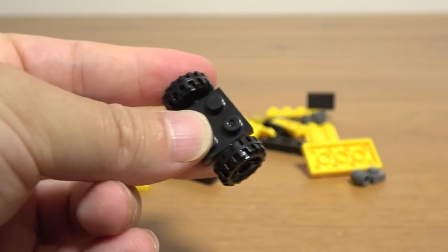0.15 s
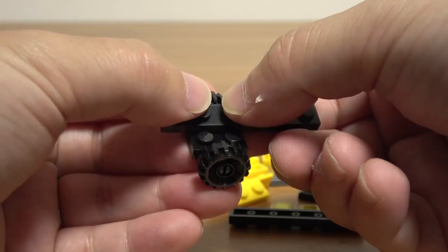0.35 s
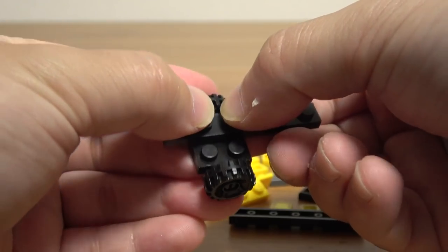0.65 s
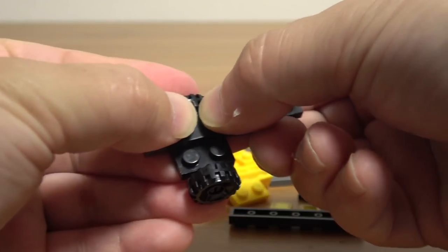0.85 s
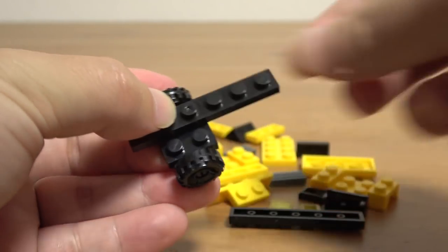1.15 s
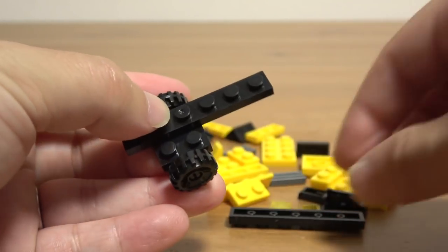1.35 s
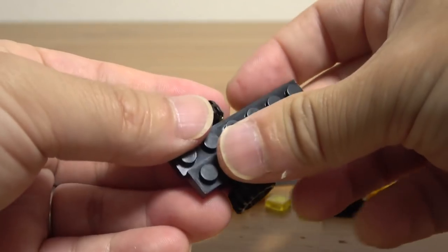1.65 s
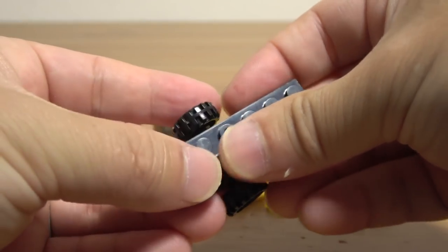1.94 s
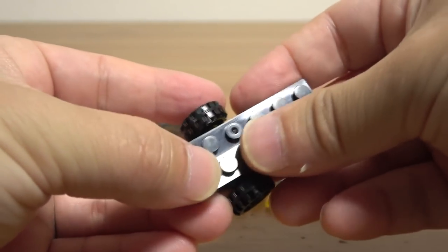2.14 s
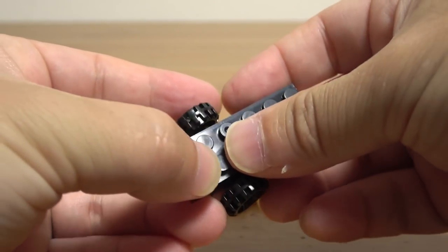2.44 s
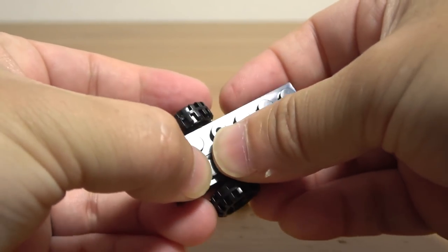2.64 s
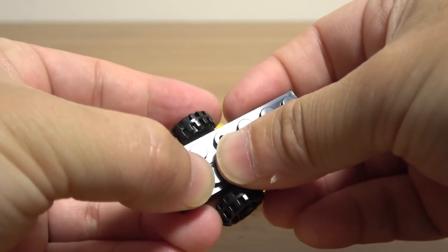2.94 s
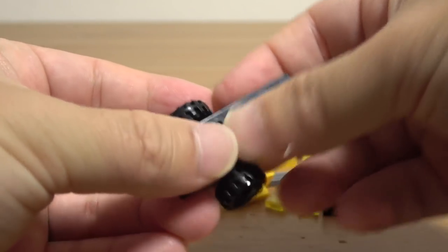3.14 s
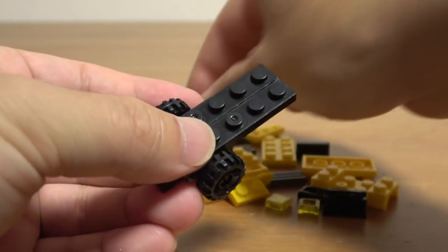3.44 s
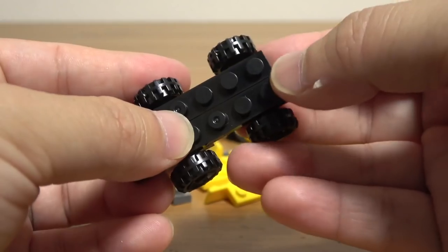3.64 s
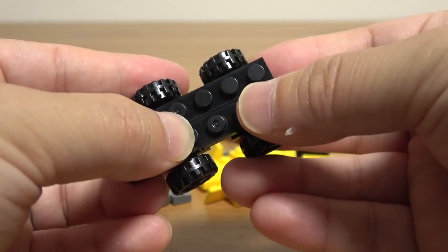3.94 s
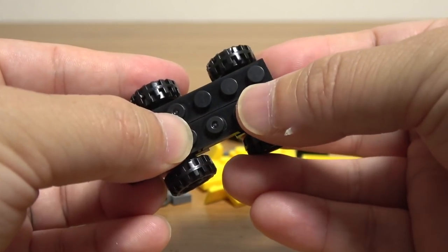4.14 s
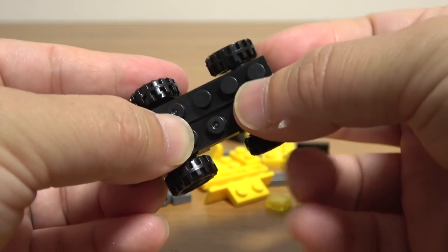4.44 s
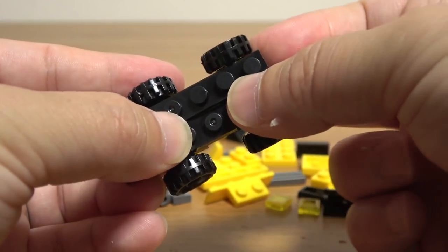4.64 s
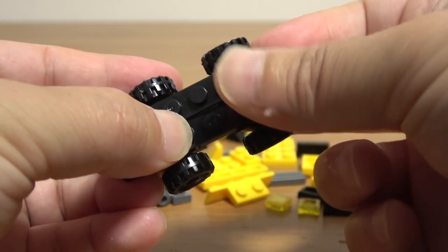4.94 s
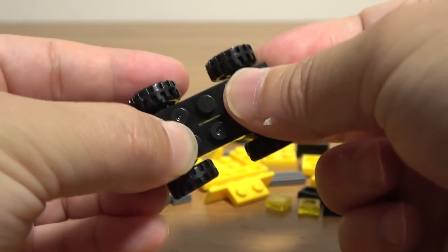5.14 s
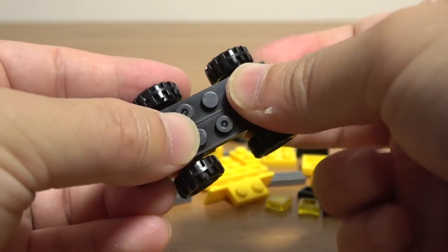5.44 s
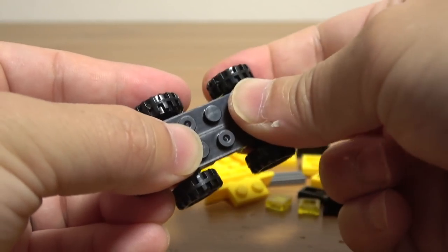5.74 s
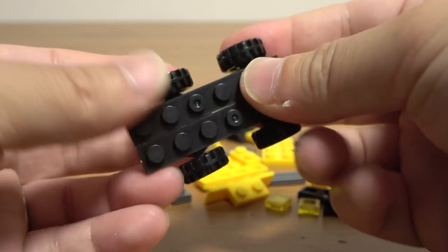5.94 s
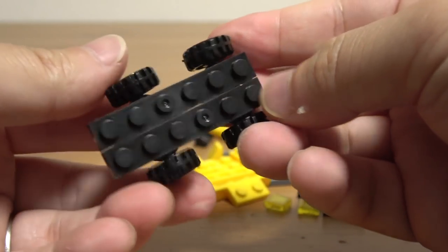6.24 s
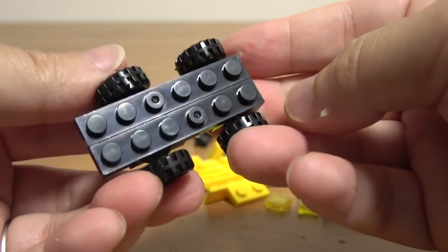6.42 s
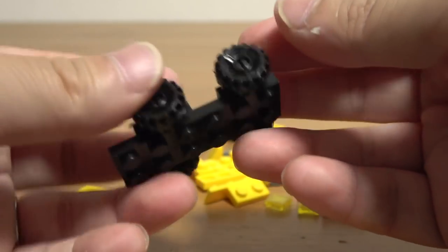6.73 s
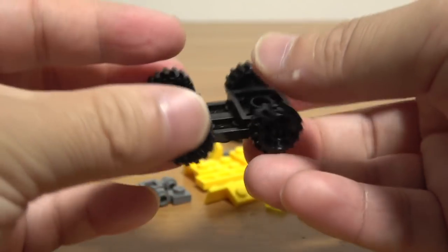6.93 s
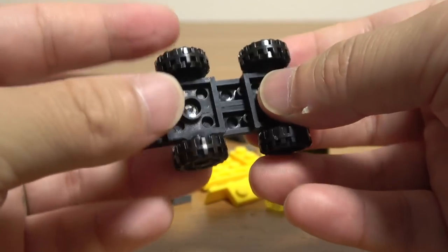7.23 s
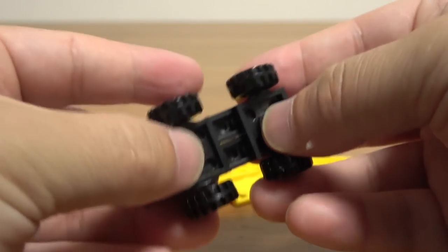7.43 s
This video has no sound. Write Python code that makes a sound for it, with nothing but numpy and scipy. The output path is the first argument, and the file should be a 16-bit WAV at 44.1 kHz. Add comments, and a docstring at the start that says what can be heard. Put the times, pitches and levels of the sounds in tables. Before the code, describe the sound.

Close up, plastic building bricks snap together one at a time, with short pauses and tiny ticks between the crisp clicks. After one especially sharp snap midway and a couple more, the handling turns into a busier patter of small clicks and soft finger rubbing. The small room is quiet, with only faint ventilation hum and hiss.

```python
"""Small plastic bricks are pressed and snapped together by hand, close by, on a wooden table.
Each contact is a brief impact that excites the damped modes of a brick; pushes pass through the hands
into the table, and sliding bricks and fingers make friction noise. A small room reflects the bricks.
Behind them are ventilation rumble, hiss, mains hum, a faint triple chirp like a far cricket,
and a small motor that buzzes on and off as its steps drive the resonances of its housing."""
import sys
import numpy as np
from scipy import signal
from scipy.fft import rfft, irfft
from scipy.io import wavfile
from scipy.ndimage import uniform_filter1d

SR = 44100
rng = np.random.default_rng(int(sys.argv[2]) if len(sys.argv) > 2 else 0)


def output_pcm(signal):
    """Save a mono or channel-first signal as 16-bit PCM at the path in sys.argv[1].

    Samples are clipped to [-1, 1] before scaling.
    """
    pcm = np.clip(np.atleast_2d(signal).T, -1, 1) * 32767
    wavfile.write(sys.argv[1], SR, np.round(pcm).astype(np.int16))


N = 334278


def gain_of(db):
    """Amplitude ratio of a level in decibels."""
    return 10 ** (np.asarray(db) / 20)


def unit(x):
    """Normalisation to unit energy."""
    return x / np.sqrt(np.sum(x ** 2) + 1e-30)


def read(points, hz):
    """Interpolation on a logarithmic frequency axis."""
    f, value = np.transpose(points)
    return np.interp(np.log(hz + 1), np.log(f + 1), value)


def add(mix, s, sound):
    """Superposition: a sound joins the mix at time s."""
    part = mix[..., round(s * SR):][..., :sound.shape[-1]]
    part += sound[..., :part.shape[-1]]


def resonate(x, hz, width):
    """Forced response of a two-pole resonator of peak gain 1."""
    return signal.lfilter(*signal.iirpeak(min(hz, .49 * SR), hz / width, SR), x)


def modes(table, t, rise_ms=0.11):
    """Free vibration: a sum of damped sines with a quick onset, of unit energy."""
    # neighbouring modes swing in opposite directions, so no holes open between them
    ring = sum((-1) ** k * gain_of(db - 60 * 1000 * t / t60) * np.sin(2 * np.pi * hz * t)
               for k, (hz, t60, db) in enumerate(table))
    return unit(ring * (1 - np.exp(-t * 1000 / rise_ms)))


def noise(density, correlation):
    """Partly coherent stereo noise of spectral density(hz, t), in dB per Hz."""
    hz, t = np.fft.rfftfreq(1024, 1 / SR), np.arange(N // 256 + 5) * 256 / SR
    a, b, c, d = rng.standard_normal((len(t), 513, 4)).T
    shared = np.clip(correlation * np.ones(513), -1, 1)[:, None]
    left = a + 1j * b
    right = shared * left + np.sqrt(1 - shared ** 2) * (c + 1j * d)
    spectra = np.array([left, right]) * gain_of(density(hz[:, None], t) + 17)
    return signal.istft(spectra, nperseg=1024, noverlap=768)[1][:, :N]


def ventilation():
    """Broadband rumble, coloured differently on each side and partly coherent between them."""
    # spectrum on each side: (frequency [Hz], density [dB per Hz])
    left = [(20, -88), (40, -81.5), (80, -99.5), (125, -81), (220, -86), (480, -89), (570, -94.5),
            (790, -79), (900, -87), (1120, -99), (1250, -97), (1550, -107), (2500, -106), (4000, -110),
            (16000, -130)]
    right = [(20, -95.5), (40, -83), (80, -91.5), (125, -83.5), (220, -88.5), (300, -87), (400, -93.5),
             (500, -92.5), (650, -99), (850, -88.5), (960, -95.5), (1130, -81.5), (1400, -103),
             (2500, -106), (16000, -130)]
    # likeness of the sides: (frequency [Hz], correlation [0-1])
    likeness = [(25, 1), (60, 1), (300, 0.76), (650, 0.58), (1000, 1), (1500, 0.69), (3000, 1)]
    return noise(lambda hz, t: np.array([read(left, hz), read(right, hz)]),
                 read(likeness, np.fft.rfftfreq(1024, 1 / SR)))


def mains_hum():
    """Narrow bands of noise are heard as wavering tones, here a little to the left."""
    # hum lines: (frequency [Hz], level [dB], bandwidth [Hz])
    lines = [(118.3, -68, 10), (239.5, -71.5, 2.8), (497.7, -74, 7.3)]
    hum = np.zeros(N)
    for hz, db, width in lines:
        tone = resonate(rng.standard_normal(N), hz, width)
        hum += gain_of(db) * tone / tone.std()
    return hum * gain_of([[1], [-1]])


def cricket(db=-71, chirps_per_s=12.9, stroke_beats=0.063, waver_rad=1.2):
    """Stridulation: three wing strokes a chirp modulate two slightly unsteady tones."""
    # delay of the chirps behind a steady beat: (time [s], lag [beats])
    lag = [(.4, -0.15), (.41, 0.33), (1.3, 0.27), (1.8, 0.52), (3.5, 0.59), (3.7, 0.43), (5, 0.49),
           (7, 0.67)]
    # strokes of one chirp: (offset [beats], level [dB])
    strokes = [(-.17, -4.5), (0, 4.5), (.16, -4.5)]
    # wing tones: (frequency [Hz], level [dB])
    wing = [(3090, -1), (3330, -5.5)]
    t = np.arange(N) / SR
    beat = chirps_per_s * t - np.interp(t, *np.transpose(lag))
    pulses = sum(gain_of(g) * np.exp(-(((beat - at + .5) % 1 - .5) / stroke_beats) ** 2)
                 for at, g in strokes)
    wander = uniform_filter1d(rng.standard_normal((len(wing), N)), 400, 1)
    tone = sum(gain_of(g) * np.sin(2 * np.pi * hz * t + waver_rad * drift / drift.std())
               for (hz, g), drift in zip(wing, wander))
    return gain_of(db) * pulses * tone / tone.std()


def background():
    """Noise floor: rumble, hum, chirps and hiss add under one level curve."""
    # microphone hiss: (frequency [Hz], density [dB per Hz])
    hiss_spectrum = [(1000, -116), (4000, -110), (6000, -108), (10000, -111), (14000, -115), (15000, -119),
                     (16000, -124)]
    # lower at first and briefly after the loudest snap: (time [s], level [dB])
    level = [(.41, -5), (.43, 1.6), (1.3, 1.5), (3.83, 0.3), (3.87, -1.5), (5.1, 0.8), (7.58, 3)]
    air, hum = ventilation(), mains_hum()
    hiss = noise(lambda hz, t: read(hiss_spectrum, hz), correlation=0.1)
    level_db = np.interp(np.arange(N) / SR, *np.transpose(level))
    return gain_of(level_db) * (air + hum + cricket() + hiss)


def motor():
    """Forced vibration: periodic steps, each with a scratch, drive the housing's resonances."""
    # motor runs: (start [s], end [s], step rate [Hz], level [dB])
    runs = [(0.276, 0.423, 260, -76), (0.755, 1.587, 250, -69.5), (2.387, 3.43, 215, -69.5),
            (3.59, 4.06, 234.2, -70), (5.103, 5.695, 180, -71), (5.717, 6.063, 260, -67.5),
            (7.048, 7.507, 260, -70.5)]
    # housing resonances: (frequency [Hz], bandwidth [Hz], level [dB])
    housing = [(3880, 140, -9), (5400, 50, 0.5), (6006, 300, -6.5), (6950, 780, -2), (7700, 200, 0.5),
               (9900, 890, -6.5), (11600, 500, -20), (12100, 400, -2.5)]
    out = np.zeros(N)
    for start, end, rate_hz, db in runs:
        t = np.arange(round((end - start) * SR)) / SR
        steps = sum(np.cos(2 * np.pi * k * rate_hz * t + 0.96 * rng.standard_normal())
                    for k in range(12, 66))
        scratch = rng.standard_normal(len(t)) * (0.25 + np.exp(-(rate_hz * t % 1) / .3))
        drive = unit(steps) + gain_of(-6) * unit(scratch)
        buzz = sum((-1) ** k * gain_of(g) * resonate(drive, hz, width)
                   for k, (hz, width, g) in enumerate(housing))
        add(out, start, gain_of(db) * unit(buzz) * np.sqrt(len(t)) * signal.windows.tukey(len(t), .3))
    return out


def room(x):
    """Reverberation: early echoes and sparse reflections that decay band by band."""
    # reverberation time: (frequency [Hz], t60 [s])
    decay = [(1000, 0.091), (2600, 0.22), (7000, 0.19), (15000, 0.13)]
    # echoes from nearby surfaces: (delay [ms], level [dB])
    echoes = [(3.9, -6), (5.8, -14.5), (9.8, -11.5)]
    # colour of the reflected sound: (frequency [Hz], gain [dB])
    walls = [(1000, 1.5), (3000, -8.5), (5500, -11), (9000, -11.5), (15000, -3)]
    taps = np.zeros((2, 16000))
    slots = np.arange(60, 15900, 12)
    arrivals = slots + rng.integers(0, 12, (2, len(slots)))
    np.put_along_axis(taps, arrivals, rng.choice([-1., 1.], arrivals.shape), 1)
    taps[1] = taps[0] + 1.1 * taps[1]  # the sides are partly coherent
    hz, t, spectra = signal.stft(taps, SR, nperseg=256)
    absorption = gain_of(-60 * t / read(decay, hz)[:, None])
    tail = unit(signal.istft(spectra * absorption, SR, nperseg=256)[1])
    for ms, db in echoes:
        tail[:, round(ms * SR / 1000)] += gain_of(db)
    grid = np.linspace(0, SR / 2, 65)
    colour = signal.minimum_phase(signal.firwin2(127, grid, gain_of(2 * read(walls, grid)), fs=SR))
    return signal.fftconvolve(x, signal.lfilter(colour, 1, tail), axes=1)[:, :N]


def finger_rub(light_db=-73.5, dulling=.3):
    """Sliding friction makes patchy noise; a firmer touch is louder and duller."""
    # fingers on plastic and skin: (time [s], level [dB])
    touch = [(0.0, -72.5), (0.42, -83), (0.8, -65), (1.41, -63), (1.71, -74.5), (2.15, -70), (3.46, -69),
             (4.16, -77.5), (4.73, -78), (5.38, -69), (5.95, -68), (6.21, -64), (6.33, -69), (6.86, -60.5),
             (7.18, -67), (7.58, -61)]

    def density(hz, t):
        patches = rng.standard_normal((len(t), 513)).T
        patches = uniform_filter1d(uniform_filter1d(patches, 20, 0), 6, 1)
        octaves = np.log2((hz + 1) / 2000)
        level_db = np.interp(t, *np.transpose(touch))
        tilt = -0.75 - dulling * (level_db - light_db)  # dB per octave above 2 kHz
        colour_db = tilt * np.maximum(octaves, 0) + 14 * np.minimum(octaves + 0.33, 0)
        return level_db - 39.5 + colour_db + 3.3 * patches / patches.std()
    return noise(density, correlation=1.0)


def table_thump(db, hz, t60_ms, knock_db):
    """Structure-borne sound: a soft push and a woody knock, then a wobble about an octave lower."""
    # table top modes: (frequency [Hz], t60 [ms], level [dB])
    wood_modes = [(346, 8.5, 8), (680, 7.3, 10.5), (840, 14, 6.5)]
    t = np.arange(5000) / SR
    push = np.sin(2 * np.pi * hz * t) * gain_of(-6e4 * t / t60_ms) * (1 - np.exp(-t / 0.0019))
    wobble = np.sin(2 * np.pi * 0.468 * hz * t) * np.exp(-((t - .035) / 0.024) ** 2)
    knock = modes(wood_modes, t)
    return gain_of(db) * (push + gain_of(-23) * wobble + gain_of(knock_db) * knock / abs(knock).max())


def scrape(start, end, db, hz, octaves, grit, slips_per_s=1800):
    """Stick-slip friction: hiss and tiny slips in one band, fading as the slide ends."""
    n = round((end - start) * SR) + 8
    sizes = rng.exponential(1, n) ** 1.3
    slips = sizes * (rng.random(n) < slips_per_s / SR) * rng.choice([-1, 1], n)
    drive = (1 - grit) * unit(rng.standard_normal(n)) + grit * unit(slips)
    band = np.exp(-(np.log2((np.fft.rfftfreq(n, 1 / SR) + 1) / hz) / octaves) ** 2)
    envelope = signal.windows.tukey(n, .3) * gain_of(np.linspace(2.5, -2.5, n))
    return gain_of(db) * np.sqrt(n) * unit(irfft(rfft(drive) * band, n)) * envelope


def grip_ticks(start, end, db, gap_s=0.015, spread_db=6.5):
    """Random impacts of a shifting grip: rows of faint clicks at uneven gaps."""
    jitter, size, ring, low, length = rng.random((30, 5)).T
    times = start + gap_s * (np.arange(30) + 0.73 * jitter)
    levels = db + spread_db * (2 * size - 1)
    ticks = zip(times, levels, 4500 * 3.05 ** ring, 1400 * 1.5 ** low, 1.2 * (.3 + 1.5 * length))
    return [(s, level, ring_hz, 0, low_hz, 1, -7, ms)
            for s, level, ring_hz, low_hz, ms in ticks if s < end]


def brick_click(db, ring_hz, lead_db, low_hz, low_db, high_db, contact_ms):
    """Impact excitation: a ragged contact rings a brick; returns direct and off-axis stereo sound."""
    # brick modes in a low, a middle and a high group: (frequency [Hz], t60 [ms], level [dB])
    mode_groups = [
        [(1150, 3.3, -3), (1660, 3.5, 5.5), (2176, 4.3, 1), (3100, 5, 3.5), (3790, 1.2, 9)],
        [(4500, 3.8, 0), (5470, 2.7, 3.5), (7860, 1.9, 7.5), (8880, 4.9, -2)],
        [(10600, 3.1, 10), (11500, 2.2, 5.5), (12450, 3, 6), (13100, 4.2, -4.5)],
    ]
    ring_t60_ms = 3.8
    # directivity: off axis the ring is weaker, the groups more even, the decay faster
    off_axis_db, contrast, blur_ms = -8.5, 0.78, .8
    t = np.arange(600) / SR
    contact = rng.standard_normal(600) * np.exp(-(t * 1000 / max(contact_ms, .05)) ** 2)
    contact[0] = 3.3
    detune = rng.uniform(0.94, 1.03, (3, 5))  # the grip shifts the modes a little
    pan_db = 1 - 2 * rng.standard_normal()  # left over right
    out = np.zeros((2, 600))
    for group, (table, group_db) in enumerate(zip(mode_groups, (low_db, 0, high_db))):
        table = [(hz * shift, t60, g) for (hz, t60, g), shift in zip(table, detune[group])]
        if group == 0:  # the size of the held part picks among the low modes
            table = [(hz, t60, g - 12 * abs(np.log2(hz / low_hz))) for hz, t60, g in table]
        polarity = -1 if group == 0 else 1  # opposite swing where the groups meet
        front = around = polarity * modes(table, t)
        if group == (2 if ring_hz > 1e4 else 1):
            ring = gain_of(lead_db) * modes([(ring_hz, ring_t60_ms, 0)], t)
            front, around = front + ring, around + gain_of(off_axis_db) * ring
        out[0] += gain_of(group_db) * unit(np.convolve(contact, front)[:600])
        out[1] += gain_of(contrast * group_db) * unit(around * np.exp(-t * 1000 / blur_ms))
    out = signal.lfilter(*signal.butter(2, 800, "high", fs=SR), out)  # small parts radiate little bass
    sides = np.array([[.5], [-.5]])
    skew_samples = .3 * rng.standard_normal() * sides  # arrival gap between left and right
    stereo = out[:, None] + skew_samples * np.gradient(out, axis=1)[:, None]
    return gain_of(db + pan_db * sides) * stereo


def scene():
    """Superposition of the bricks, their reflections, table, fingers, motor and background."""
    # brick impacts: (time [s], middle group level [dB], ring [Hz], ring over its group [dB],
    # low group centre [Hz], low over middle [dB], high over middle [dB], contact [ms])
    clicks = [(0.6807, -13.5, 6900, 9, 2000, -17, -2, 2.4),
              (0.6819, -2, 7270, 25, 2020, -19.5, -10.5, 0.51),
              (0.858, -16, 6660, 31, 2020, -12.5, -19, 0.15), (0.871, -23, 6800, 21, 2670, -9, -10, 0.16),
              (0.8899, -19.5, 6600, 31, 2020, -7, -17, 0.19),
              (0.915, -24.5, 6750, 22, 2560, -4.5, -18, 0.31),
              (1.1295, -26.5, 7000, 10, 1420, -27, -7, 0.17), (1.1472, -25, 6500, 8, 2850, -10, -1.5, 0.26),
              (1.1521, -30, 14080, 0, 2770, -3, -1, 0.38), (1.937, -32.5, 6070, 7, 1980, -7, -9, 0.2),
              (1.9509, -35, 6030, 8, 1340, -7, -7, 0.1), (1.9597, -36, 6030, 7, 1890, -12, -10, 0.6),
              (1.9954, -11.5, 6540, 34, 1920, -15.5, -20, 0.22),
              (2.025, -28.5, 6300, -12, 2800, -4.5, -9, 0.89),
              (2.2396, -8, 7600, 19, 2830, -11.5, -8.5, 0.49), (2.5588, -22.5, 7330, 6, 1310, -12, -2, 3.5),
              (3.0917, -26.5, 7300, 2, 1550, -23, -3.5, 0.72), (3.2353, -28.5, 7620, 8, 3140, -5, -6, 0.66),
              (3.244, -26.5, 9000, 10, 2110, -11, -7, 1.3), (3.248, -36, 12750, 3, 2120, 1, 5, 0.62),
              (3.8304, 7.5, 9100, 10, 2092, -28, -12, 0.14),
              (4.1355, -18, 8640, 13, 1360, -18.5, -30, 0.82),
              (4.3844, -47.5, 9140, -3.5, 1950, 3.5, -3.5, 1.4), (4.432, -40.5, 8830, 6, 2580, 0, -7, 2),
              (4.806, -46.5, 4940, 4, 1820, -4.5, -17, 1.2), (4.9206, -37, 5470, 15, 1340, -24, -2, 0.33),
              (4.9594, -32.5, 10590, 1, 1340, -20, -3, 0.19), (4.9647, -30.5, 5100, 10, 3880, -18, -3, 3.3),
              (5.055, -42, 11900, 9, 1340, -15, 3, 1.5), (5.1534, -3.5, 8340, 14.5, 3100, -12, -5.5, 0.18),
              (5.1931, -23, 8140, 9, 1370, -3, -9, 5.8), (5.1965, -9.5, 8760, 7.5, 2000, -17.5, -5, 0.29),
              (5.5478, -30, 10770, -6, 1340, -15, 1, 0.55), (5.549, -39, 13300, 10, 2700, 9.5, 13, 2),
              (5.576, -23.5, 6700, 1, 3480, -7, -12.5, 0.088), (5.612, -38, 5560, -1, 2890, -9, 0, 0.2),
              (5.654, -23, 6150, 0, 3760, 0, -1, 0.23), (5.9384, -28, 5840, 0, 3070, -5, -4.5, 1),
              (5.9503, -25, 6260, 16, 3430, -22, -22, 0.3), (5.9716, -32.5, 7410, -4, 2580, -3, -3, 0.83),
              (6.0475, -24, 4870, -3, 2760, -22, -4, 0.29), (6.053, -42.5, 4300, -1, 1660, 14, -2, 3.7),
              (6.1262, -15.5, 5370, -9, 2900, -6.5, -14, 0.1), (6.1557, -36, 11240, 4.5, 2410, -6, 3, 1.2),
              (6.1734, -38, 11540, 5, 3860, 6, 8, 2.1), (6.2352, -27.5, 13200, 0, 2300, 1, 0, 3.6),
              (6.3392, -26.5, 4470, 9, 1920, -2, -6.5, 0.52), (6.3525, -33.5, 10510, -2, 3100, 8, 1, 3.3),
              (6.3614, -32.5, 4500, -14, 3530, 9, -10, 0.75), (6.3654, -24.5, 4400, 3, 3660, -14, -4, 1.2),
              (6.5377, -29.5, 7130, -2, 3320, -4.5, -6, 0.092),
              (6.7056, -39.5, 11000, 2.5, 3400, -9, 2.5, 2.8), (6.8018, -14, 13600, 8, 1720, -10.5, 3, 2.1),
              (6.8057, -16.5, 4800, 14, 3230, -1, -3, 0.73),
              (6.8154, -20.5, 4340, 17, 3570, 0.5, -18, 0.15),
              (6.8926, -11.5, 7100, -3, 2520, -10, -11.5, 0.37),
              (6.9024, -15.5, 11000, -3, 3000, -4, -2.5, 3.4),
              (6.905, -17.5, 4600, 5, 2890, -28, -21, 0.11), (6.9594, -19, 7840, 25, 2820, -6.5, 0, 2),
              (6.9647, -27.5, 4700, 2, 2560, 0.5, -8, 0.82), (7.036, -38, 10120, -5, 1420, 2.5, 5.5, 1.5),
              (7.1536, -37.5, 4640, 11, 1340, 1, -8, 0.78), (7.2147, -37.5, 10600, -5, 2020, 0, 5, 1),
              (7.5072, -25.5, 10200, -17, 3100, -1.5, 2.5, 2.8),
              (7.5118, -26.5, 13650, 10, 1870, 2.5, 11.5, 1.9)]
    # shifts of grip: (start [s], end [s], level [dB])
    flurries = [(1.797, 1.813, -56), (1.876, 1.945, -48), (3.083, 3.097, -42), (3.216, 3.245, -44),
                (5.977, 5.999, -35.5), (6.038, 6.05, -36), (6.156, 6.179, -40), (6.469, 6.48, -43.5),
                (7.148, 7.166, -38)]
    # brick on brick or skin: (start [s], end [s], level [dB], centre [Hz], width [octaves], grit [0-1])
    slides = [(0.859, 0.933, -64, 2470, 1.4, 0.8), (1.135, 1.16, -59, 7000, 0.83, 0.3),
              (1.792, 1.843, -66, 6900, 0.54, 0.8), (2.007, 2.12, -62, 7700, 0.71, 0.47),
              (2.167, 2.26, -69.5, 7150, .5, 0), (3.211, 3.264, -61, 5960, 2.7, 0.2),
              (3.307, 3.392, -61.5, 8800, 2.1, 0), (3.35, 3.544, -69.5, 1830, 0.27, 0.26),
              (3.587, 3.632, -65, 9000, 0.46, 0.2), (4.91, 4.969, -61.5, 7100, 1, 1),
              (5.546, 5.612, -55.5, 4940, 0.98, 0.8), (5.937, 6.025, -61, 4500, 2.1, 0.4),
              (6.045, 6.073, -54.5, 3980, 1.6, 0.2), (6.114, 6.196, -54, 4960, 1.9, 0.75),
              (6.24, 6.27, -67, 5000, 2.1, 0.7), (6.31, 6.394, -63.5, 4000, 1.6, 0.9),
              (6.472, 6.492, -73, 4000, 2.1, 0.5), (6.787, 6.841, -53.5, 5000, 1, 0.2),
              (6.882, 6.932, -50, 5000, 2.1, 0.96), (6.952, 6.996, -59, 6000, 3.7, 0.2),
              (7.505, 7.56, -58.5, 8000, 2.3, 1)]
    # pushes into the table: (time [s], level [dB], frequency [Hz], t60 [ms], relative knock level [dB])
    pushes = [(0.68, -24, 191, 27, -5), (1.994, -29.5, 196, 24, -16), (2.024, -41, 231, 32, -8),
              (2.24, -34.5, 304, 10, -8), (2.554, -29, 166, 28, -25), (5.1955, -34.5, 260, 20, -9.5),
              (5.653, -37, 124, 18, -29), (6.054, -48, 126, 45, 2)]
    direct, to_walls, table = np.zeros((2, N)), np.zeros((2, N)), np.zeros(N)
    ticks = [tick for span in flurries for tick in grip_ticks(*span)]
    for s, *impact in clicks + ticks:
        front, around = brick_click(*impact)
        add(direct, s, front)
        add(to_walls, s, around)
    for start, *friction in slides:
        slide = scrape(start, *friction)
        add(direct, start, slide)
        add(to_walls, start, slide)
    for s, *push in pushes:
        add(table, s, table_thump(*push))
    return direct + room(to_walls) + table + finger_rub() + motor() + background()


def record(dry, edge_hz=15900):
    """Band limiting by a steep linear-phase low-pass filter."""
    lowpass = signal.firwin(255, edge_hz, window=("kaiser", 9), fs=SR)
    return signal.oaconvolve(dry, lowpass[None], "same")


dry = scene()
out = record(dry)
output_pcm(out)
```